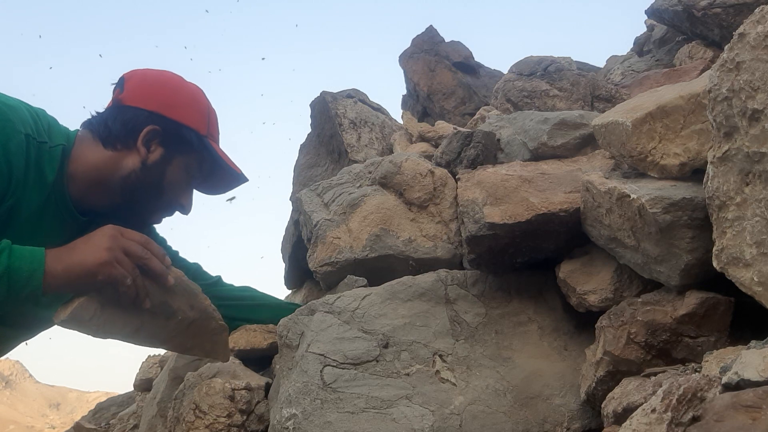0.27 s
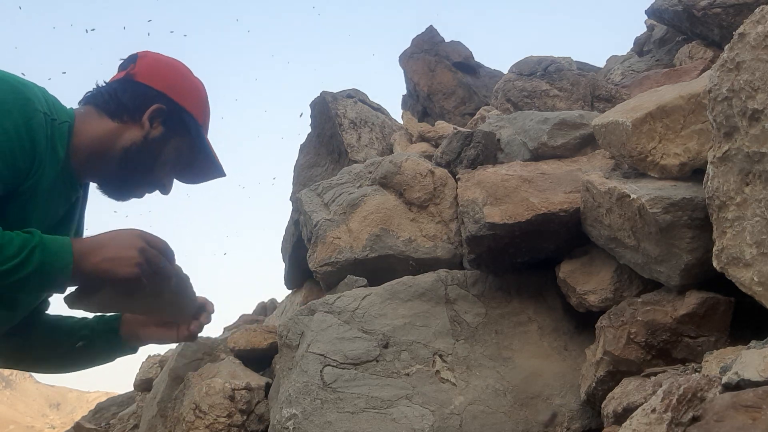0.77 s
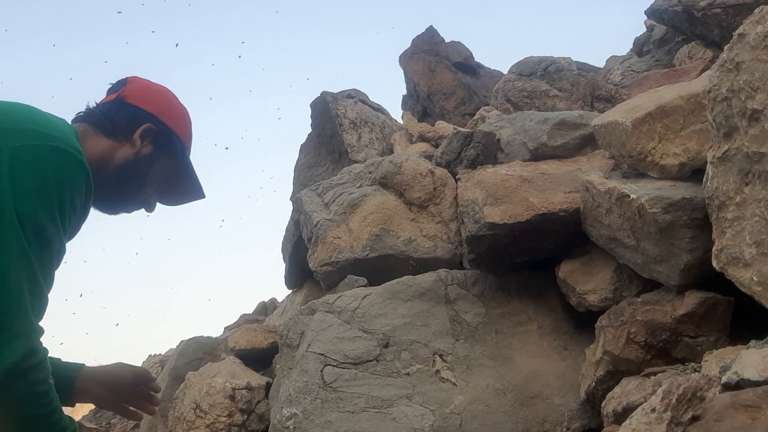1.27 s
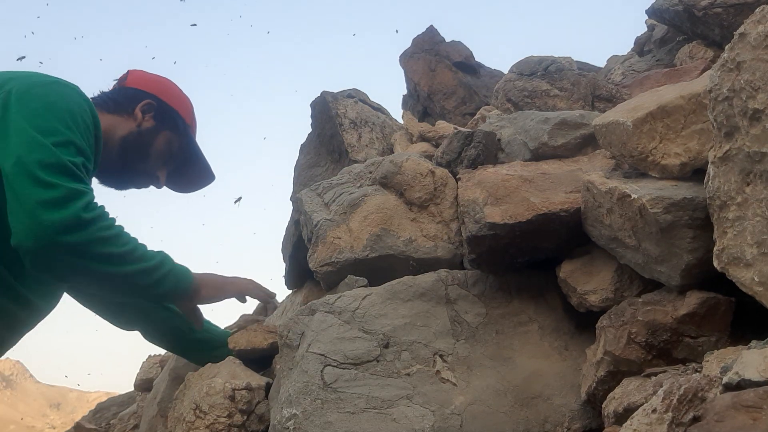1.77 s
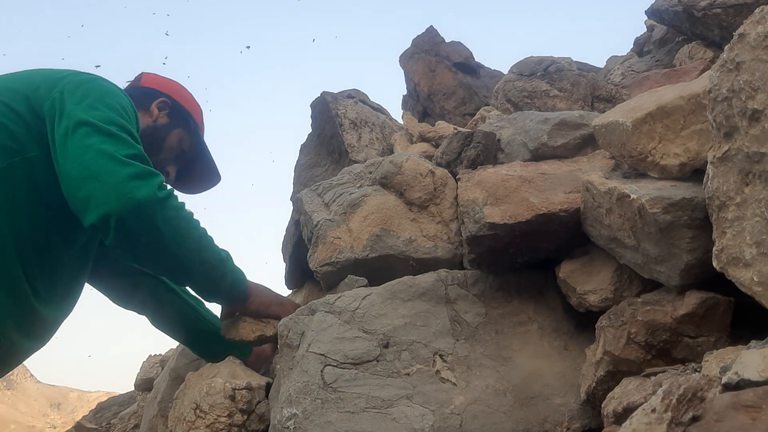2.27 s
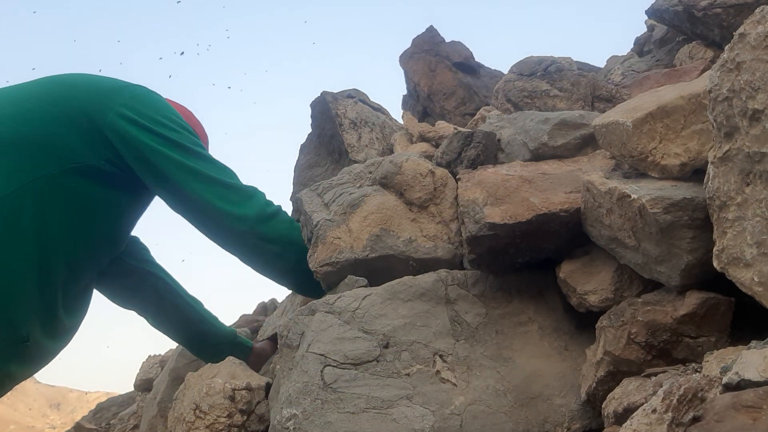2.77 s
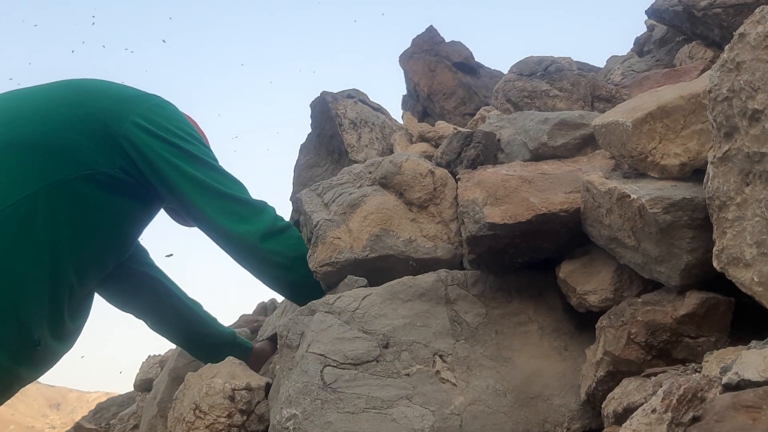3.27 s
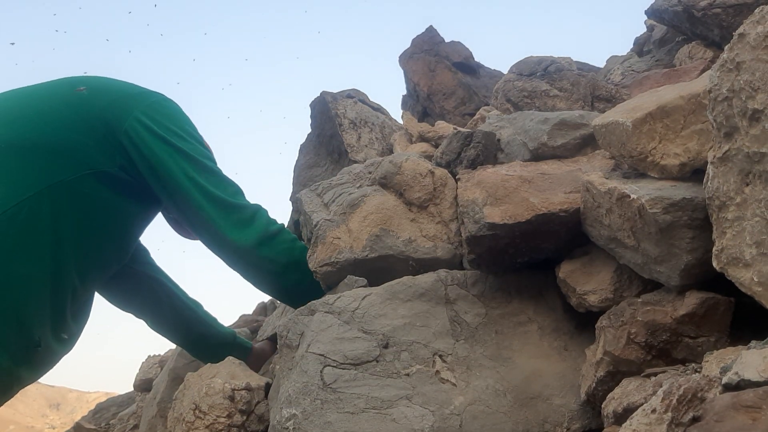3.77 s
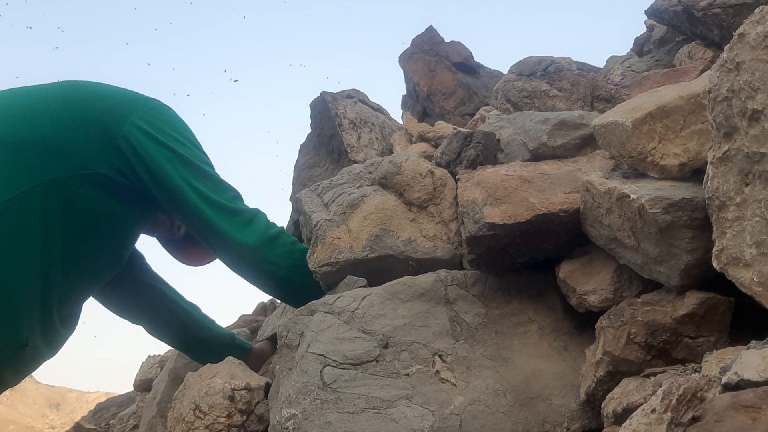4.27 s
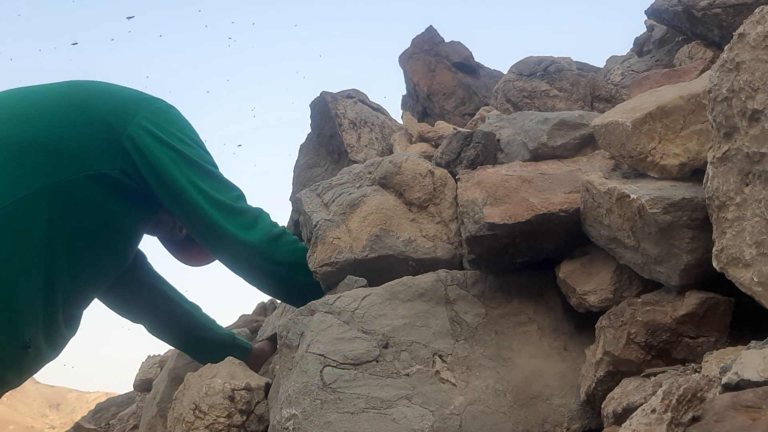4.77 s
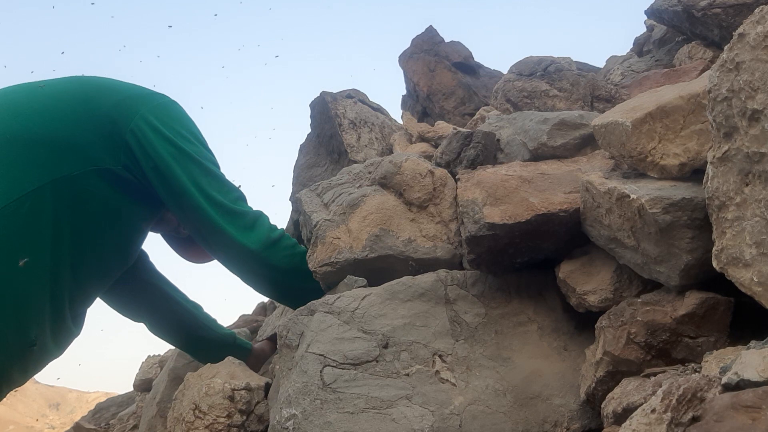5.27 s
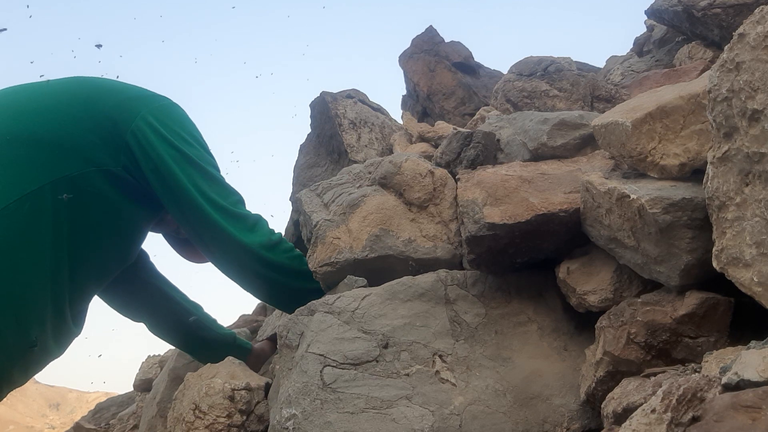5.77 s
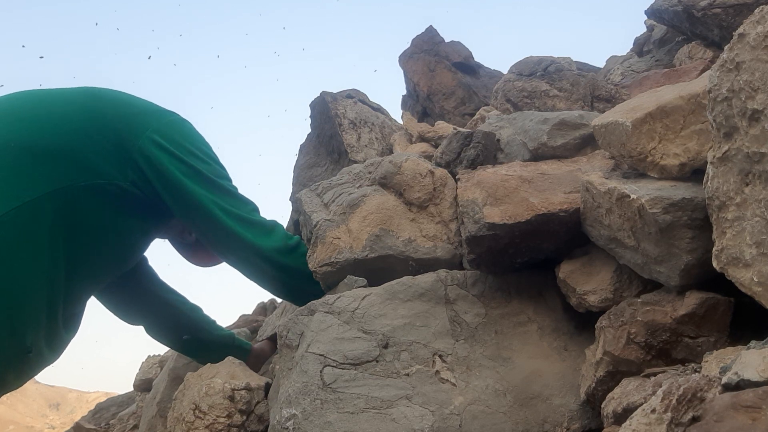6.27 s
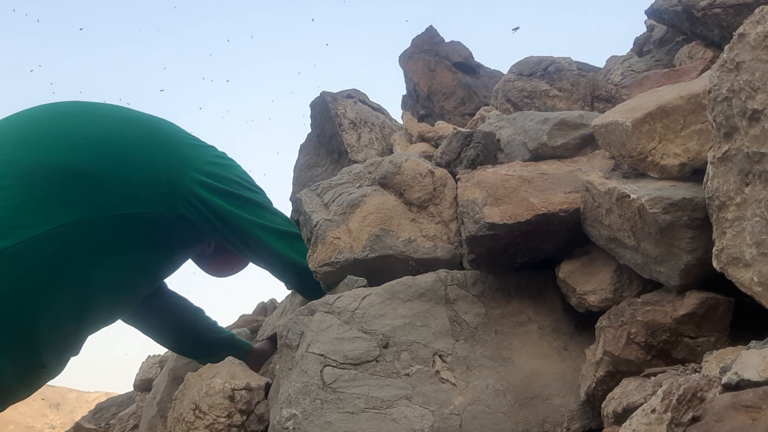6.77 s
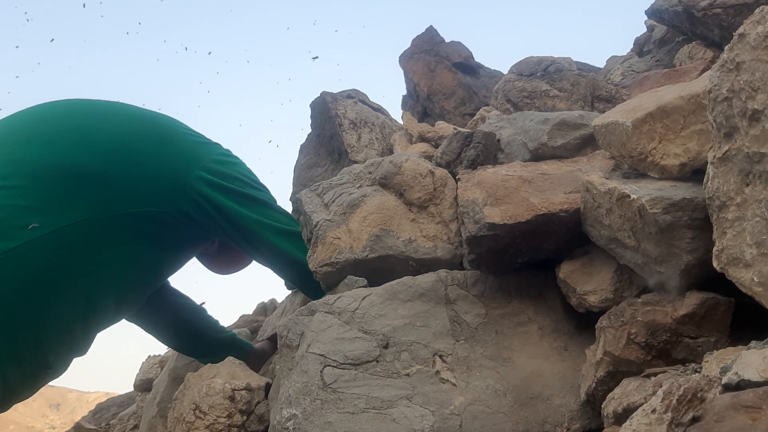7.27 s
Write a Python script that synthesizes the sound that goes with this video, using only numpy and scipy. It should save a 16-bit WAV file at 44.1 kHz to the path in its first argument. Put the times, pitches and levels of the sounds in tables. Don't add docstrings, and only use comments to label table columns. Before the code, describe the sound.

On a stony slope, bees drone softly over air hiss. A dropped metal bar clanks twice in quick succession, sharp and bright with a rocky thud, its ring fading in under a second. Afterwards dull stone knocks, small chip clicks and gritty scrapes come in uneven clusters, mostly nearer the left, while wind flutters low against the microphone, stronger on the right. The end is sparser.

```python
import sys
import numpy as np
from scipy import signal
from scipy.fft import rfft, irfft
from scipy.io import wavfile

SR = 44100
rng = np.random.default_rng(int(sys.argv[2]) if len(sys.argv) > 2 else 0)


def attenuation_scalar(level_db):
    decades = np.asarray(level_db, float) / 20
    return 10 ** decades


def bounce(signal):
    frames = np.transpose(np.atleast_2d(signal))
    limited = np.clip(frames, -1, 1)
    pcm = np.round(limited * 32767).astype(np.int16)
    wavfile.write(sys.argv[1], SR, pcm)


N = 332073
T = np.arange(N) / SR
LEFT_LAG_SAMPLES = -8

# f/Hz, density/dB per Hz
AIR_SPECTRUM = [(18, -44), (32, -14.5), (75, -6), (124, -17), (173, -2.5), (262, -18), (373, -2),
                (730, -16), (960, -11), (1300, -18), (1550, -15.5), (1780, -26.5), (2070, -20.5),
                (2400, -28),
                (2800, -29.5), (3500, -30.5), (4500, -29), (4900, -25), (6500, -22.5), (7700, -23.5),
                     (8100, -43), (9000, -41.5), (9900, -37), (10300, -28), (12000, -22), (15700, -19)]
# f/Hz, likeness/1
PORT_LIKENESS = [(60, 0.72), (180, 0.72), (550, 0.083), (1650, 0.018), (4970, 0.12), (15000, 0.081)]
# f/Hz, L-R/dB
PORT_LEAN = [(60, 4.5), (180, 8), (550, 9.5), (1650, 6.5), (4970, 12.5), (15000, 7)]
# t/s, level/dB
SWARM_LEVEL = [(0.0, -74.5), (0.57, -81.5), (0.8, -84), (1.05, -70.5), (1.4, -73), (1.6, -62),
               (2.33, -83.5), (2.95, -67.5), (3.67, -66.5), (3.86, -63), (4.03, -71.5), (4.53, -67.5),
               (4.72, -75), (6.46, -71), (7.13, -68), (7.53, -67)]
# multiple/1, level/dB
WING_HARMONICS = [(1, -10), (2, -1.5), (3, -13.5), (4, -10), (5, -10.5), (6, -13.5), (7, -22.5), (8, -24)]
# t/s, length/s, start f/Hz, end f/Hz, level/dB
BIRD_NOTES = [(1.385, 0.058, 4100, 3790, -78), (3.01, 0.058, 4080, 3790, -83),
              (4.71, 0.082, 4080, 3700, -83.5), (5.295, .045, 4400, 4100, -80.5),
              (5.34, 0.15, 4840, 4450, -76.5), (5.47, .08, 2870, 2800, -86), (5.69, 0.052, 5440, 5000, -82),
              (5.98, .05, 5620, 5200, -78.5)]
# t/s, peak/dB, rise/s, fall/s (20 dB each), L-R/dB
WIND_GUSTS = [(1.56, -53, .1, 0.19, 3.5), (2.01, -75, .27, .15, -19), (2.39, -59, 0.11, 0.13, -22),
              (2.56, -62.5, 0.28, 0.42, -11), (2.92, -46.5, 0.23, 0.48, -13),
              (3.30, -45.5, 0.12, 0.24, -16.5), (3.44, -46, .2, 0.044, -9.5), (3.6, -52, .09, 0.56, -5.5),
              (3.89, -53, .15, .11, -8), (4.05, -59, .3, 0.047, 12.5), (4.16, -58, 0.035, 0.46, -16.5),
              (4.28, -50, 0.14, 0.16, -10), (4.36, -60, .1, 0.046, -16), (4.46, -67, .2, 0.57, 4),
              (4.85, -61.5, 0.28, 0.24, -9), (4.97, -56.5, 0.22, 0.4, -1), (5.09, -48.5, 0.19, 0.12, -12),
              (5.31, -48.5, 0.08, 0.17, 20.5), (5.41, -53, 0.16, 0.039, 16), (5.87, -61, .1, 0.34, -0.5),
              (6.13, -64, 0.37, 0.031, -19.5), (6.53, -65.5, 0.064, .08, -17), (7.4, -68, 0.31, 0.2, -15)]
# t/s, peak/dB
RIGHT_PUFFS = [(4.149, -37.5), (4.189, -34), (4.329, -43), (5.066, -38.5)]
# t/s, peak/dB, rise/s, fall/s (20 dB each)
GRIT_STROKES = [(2.396, -82, 0.058, 0.046), (4.956, -57.5, 0.0099, 0.042), (5.035, -63, 0.036, 0.028),
                (5.062, -58, 0.015, 0.017), (5.09, -75, .03, 0.13), (5.81, -71, 0.025, .04)]
# f/Hz, density/dB per Hz
GRIT_SPECTRUM = [(590, -45), (1000, -9), (1150, -16), (2010, -9), (3330, -21), (4920, -17.5), (5650, -20.5),
                 (7700, -23), (8440, -56), (11600, -33), (15500, -31)]
# t/s, peak/dB, pitch f/Hz, bright part/dB, its tilt/dB per octave
STONE_KNOCKS = [(2.032, -61, 413, -1.5, 0), (2.283, -65.5, 357, 0, -0.5), (2.366, -58, 341, -3.5, -1.5),
                (2.578, -62.5, 354, -7, 3), (2.648, -58, 285, -12.5, 0), (2.8109, -36, 304, 2.5, 0.5),
                (2.863, -48.5, 399, 1, 3), (3.052, -36.5, 416, -6, -2), (3.299, -51, 327.5, -6.5, 1),
                (3.429, -51, 232, -9.5, 2.5), (3.761, -41, 392, -8.5, -5.5), (3.797, -48, 218, -25, 0),
                (3.862, -37, 384, -19, -8), (3.954, -53, 263, -16.5, 2), (4.237, -50, 355, -3.5, 6),
                (4.269, -42.5, 300, -8, 5.5), (4.304, -44.5, 269, -19, 2), (4.469, -46, 226, -1, -8),
                (4.714, -59.5, 236, -13, 0.5), (4.927, -50, 402, -20, 3), (4.9525, -32, 360, -6, -0.5),
                (5.02, -42.5, 261, -15.5, 0.5), (5.059, -54.5, 280, -0.5, 5), (5.234, -48, 253, -19, -3),
                (5.782, -38, 270, -22.5, 0), (5.81, -46.5, 239, -14, 0), (6.691, -44.5, 260, -6.5, -5.5),
                (6.921, -39, 284, -2.5, -11), (6.931, -43, 267, -3, -8), (6.942, -46, 238, -20.5, -4.5),
                (7.17, -52, 292, -19.5, 0)]
# f/Hz, level/dB, t60/s
STONE_MODES = [(518, 4.5, 0.06), (700, -0.5, 0.048), (852, 6.5, 0.037), (956.7, 1.5, 0.059),
               (1150, -10.5, 0.025), (1560, -9, 0.06), (2050, -19, 0.035)]
# t/s, peak/dB, f/Hz, t60/s
SHORT_PINGS = [(1.653, -46.5, 6360, 0.07), (1.654, -60, 7130, 0.2), (1.654, -61, 12530, 0.13),
               (1.66, -66, 11900, 0.14), (2.819, -63.5, 6630, 0.082), (2.87, -73.5, 6700, 0.15),
               (1.695, -61, 3584, 0.26), (2.36, -69.5, 2270, 0.13), (2.645, -69.5, 2290, 0.18),
               (2.811, -60.5, 2050, 0.11), (2.82, -80, 8180, 0.13), (2.82, -74, 10410, 0.23),
               (2.838, -68, 2280, 0.051), (2.888, -64, 2284, 0.11), (3.10, -65, 2335, 0.17),
               (3.31, -69.5, 6650, 0.09), (3.60, -73, 6460, 0.064), (4.243, -63.5, 6650, 0.24),
               (4.72, -74.5, 6700, 0.044), (5.057, -48.5, 5550, 0.024), (5.058, -58.5, 4400, .025),
               (5.06, -63, 7000, 0.037), (5.07, -65, 2450, 0.064), (4.927, -66, 1550, .05),
               (2.865, -66, 2040, 0.1), (5.785, -75, 6600, .06)]
# t/s, peak/dB, rise/s, fall/s (20 dB each)
STONE_HEAVES = [(1.48, -33, 0.0084, 0.19), (1.59, -25, 0.045, 0.011), (1.67, -35, 0.084, 0.064),
                (1.96, -55.5, 0.29, 0.089), (2.05, -56, 0.082, 0.083), (2.37, -50.5, 0.089, 0.068),
                (2.62, -59, 0.15, 0.52), (2.85, -48, 0.057, 0.21), (3.065, -45, 0.036, 0.12),
                (3.43, -50.5, 0.66, .12), (3.62, -56, 0.45, .5), (3.775, -45, .015, 0.078),
                (3.875, -39.5, 0.014, 0.12), (3.96, -47.5, 0.11, 0.082), (4.2, -52.5, 0.024, .05),
                (4.28, -43.5, 0.11, 0.11), (4.49, -47, 0.049, 0.12), (4.73, -55, 0.041, 0.06),
                (4.962, -38.5, 0.01, 0.16), (5.24, -57, 0.21, 0.046), (5.31, -50, 0.047, 0.18),
                (5.79, -43, 0.022, 0.16), (6.71, -45, 0.028, 0.097), (6.95, -47, 0.045, 0.079),
                (7.2, -48.5, 0.17, 0.13)]
# f/Hz, level on one face/dB, level on other face/dB, t60/s, L-R/dB
BAR_MODES = [(2215, 0, 0, .35, 8.5), (3596, -16, -40, .13, 13), (3582, -58, -28, .2, -14),
             (4433, -47, -43, .06, 6), (5570, -47, -34, .15, 14), (6347, -61, -40, .08, 19),
             (7182, -52, -54, .1, 19), (10030, -75, -56, .05, 8), (10780, -56, -51, .07, 7),
             (12100, -62, -52, .09, 3), (12460, -64, -54, .1, 5), (2056, -18, -20, .03, 8),
             (2290, -18, -19, .03, 8), (15500, -52, -80, .05, 6)]
# t/s, blow/dB, ring kept/0-1, overtones/dB, thud/dB
BAR_BOUNCES = [(1.468, -43, 0.8, 7, -52.5), (1.4721, -7.5, .9, 5, -19.5), (1.4885, -29, 0.9, -7, -20.5),
               (1.520, -36, 0.91, 10, -30.5), (1.5635, -42.5, 0.06, 20, -26),
               (1.5795, -8.5, 0.13, 7, -16.5), (1.63, -49, 0.57, 16, -31.5), (1.654, -59, 0.78, 34.5, -27),
               (1.670, -54, 0.86, 14.5, -51.5), (1.684, -61.5, 0.32, -2, -40.5), (1.694, -69, 0, -6, -49),
               (1.708, -75, 0, 5, -49)]
# f/Hz, level/dB, t60/s
GROUND_MODES = [(750, -2, 0.029), (786, -4.5, 0.036), (938, -7.5, .04), (1126.6, -10, .03),
                (1594, -3.5, .025), (2870, -10.5, .025), (4632, -30.5, .01), (1556, -5, .045),
                (3300, -9, .03)]
# t/s, level/dB
BAR_ROCKING = [
    (1.708, -52.5),
    (1.829, -61),
    (1.899, -55.5),
    (1.95, -60),
    (2.022, -60.5),
    (2.1, -68),
    (2.2, -70.5),
]


def rms_one(x):
    return x / np.sqrt(np.mean(x ** 2) + 1e-20)


def at_hz(points, hz):
    table_hz, value = np.transpose(points)
    return np.interp(np.log(hz + 1), np.log(table_hz), value)


def drift(rate_hz):
    r = np.exp(-80 * np.pi * rate_hz / SR)
    slow = signal.lfilter([1], [1, -2 * r, r * r], rng.standard_normal(N // 40 + 2002))[2000:]
    return np.interp(np.arange(N) / 40, np.arange(len(slow)), rms_one(slow - slow.mean()))


def ring(clicks, hz, t60_s):
    r = attenuation_scalar(-60 / (t60_s * SR))
    w = 2 * np.pi * hz / SR
    return signal.lfilter([0, np.sin(w)], [1, -2 * r * np.cos(w), r * r], clicks + 1e-18)


def band(x, low_hz, high_hz):
    return signal.sosfilt(signal.butter(2, [low_hz, high_hz], "band", fs=SR, output="sos"), x)


def place(x, pan_db, lag_samples):
    left = np.roll(x, max(round(lag_samples), 0)) * attenuation_scalar(pan_db / 2)
    right = np.roll(x, max(-round(lag_samples), 0)) * attenuation_scalar(-pan_db / 2)
    return np.array([left, right])


def add(out, s, sound):
    i = round(s * SR)
    out[..., i:i + sound.shape[-1]] += sound[..., :N - i]


def swells(rows):
    s, peak_db, rise_s, fall_s = np.transpose(rows)[:4, :, None]
    t = T[::40]
    return attenuation_scalar(peak_db - 20 * np.maximum((s - t) / rise_s, (t - s) / fall_s))


def joined(gains):
    return np.interp(T, T[::40], np.sqrt(np.sum(gains ** 2, axis=0)))


def air():
    floor_db, duck_db = -77.5, 5.5
    sink_s, hold_s, recover_s = .3, .85, .3
    hz = np.arange(N // 2 + 1) * SR / N
    mid, side = rfft(rng.standard_normal((2, N))) * attenuation_scalar(at_hz(AIR_SPECTRUM, hz))
    alike = at_hz(PORT_LIKENESS, hz)
    lean = attenuation_scalar(at_hz(PORT_LEAN, hz) / 2)
    left = (np.sqrt(1 + alike) * mid + np.sqrt(1 - alike) * side) * lean
    right = (np.sqrt(1 + alike) * mid - np.sqrt(1 - alike) * side) / lean
    duck = np.interp(T - BAR_BOUNCES[5][0], np.cumsum([0, sink_s, hold_s, recover_s]), [0, 1, 1, 0])
    level_db = floor_db - duck_db * duck + 13.5 + 1.0 * drift(12.0)
    return rms_one(irfft(np.array([left, right]), N)) * attenuation_scalar(level_db)


def bees(count=9):
    out = 0
    for hz in np.linspace(167, 194, count):
        wing_hz = hz * (1 + .022 * drift(1.5) + .012 * drift(25))
        phase = 2 * np.pi * np.cumsum(wing_hz) / SR
        buzz = sum(attenuation_scalar(level_db) * np.sin(k * phase) for k, level_db in WING_HARMONICS)
        lag_samples = LEFT_LAG_SAMPLES + 6 * rng.standard_normal()
        out = out + place(buzz * attenuation_scalar(4.5 * drift(7.5)), 7.0, lag_samples)
    s, swarm_db = np.transpose(SWARM_LEVEL)
    return rms_one(out) * attenuation_scalar(np.interp(T, s, swarm_db) + 1.5)


def birds():
    out = np.zeros(N)
    for s, length_s, from_hz, to_hz, level_db in BIRD_NOTES:
        n = round(length_s * SR)
        phase = 2 * np.pi * np.cumsum(np.linspace(from_hz, to_hz, n)) / SR
        add(out, s, attenuation_scalar(level_db) * np.hanning(n) ** .5 * np.sin(phase))
    return place(out * attenuation_scalar(4.2 * drift(109.2) - 2.5), 14.0, LEFT_LAG_SAMPLES)


def buffeting():
    calm_db, shed_hz = -85.5, 26
    t = np.arange(SR // 16) / SR
    puff_hz = 45 + 100 * np.exp(-t / .014)
    puff = np.sin(2 * np.pi * np.cumsum(puff_hz) / SR) * t * np.exp(-t / .0075)
    puff = band(puff / puff.max(), 30, 300)
    shed = np.array([np.cumsum(shed_hz * attenuation_scalar(4 * drift(8))) / SR for port in range(2)])
    clicks = np.diff(np.floor(shed), prepend=0) * attenuation_scalar(3 * rng.standard_normal((2, N)))
    clicks = clicks * rng.choice([-1, 1], (2, N))
    lean = attenuation_scalar(np.array(WIND_GUSTS)[:, 4:] * [.5, -.5])
    lean = lean / np.sqrt(np.mean(lean ** 2, axis=1, keepdims=True))
    gusts = np.array([joined(swells(WIND_GUSTS) * port[:, None]) for port in lean.T])
    gusts = gusts + attenuation_scalar(calm_db) * (T > BAR_BOUNCES[0][0])
    eddies = rms_one(band(signal.fftconvolve(clicks, puff[None], axes=1)[:, :N], 22, 105))
    swings = rms_one(band(band(rng.standard_normal((2, N)), 28.34, 82), 25, 74.8))
    out = (eddies + 0.98 * swings) * attenuation_scalar(-5.0) * gusts
    for s, peak_db in RIGHT_PUFFS:
        add(out, s, attenuation_scalar(peak_db) * puff * attenuation_scalar([[-14], [0]]))
    return out


def grit():
    grains = rng.standard_normal(N) * attenuation_scalar(1.6 * np.minimum(rng.exponential(1, N), 5))
    colour = attenuation_scalar(at_hz(GRIT_SPECTRUM, np.arange(N // 2 + 1) * SR / N))
    grains = rms_one(irfft(rfft(grains) * colour, N))
    return place(grains * joined(swells(GRIT_STROKES)) * attenuation_scalar(2.5), 9.0, LEFT_LAG_SAMPLES)


def knock(hz, bright_db, t60_s, modes, top_hz, chance, crush, spread_db):
    t = np.arange(len(chance)) / SR
    touch = np.convolve(t == 0, np.hanning(18))[:len(t)] / 8
    touch = touch + .05 * chance * attenuation_scalar(-60 * t / (1.5 * t60_s))
    low = ring(touch, hz, 0.85 * t60_s)
    low = low + 0.52 * ring(touch, 0.63 * hz, t60_s)
    low = low - 0.6 * ring(touch, 1.463 * hz, .5 * t60_s)
    high = 0
    for (mode_hz, db, mode_t60_s), z in zip(modes, chance):
        high = high + attenuation_scalar(db + spread_db * z) * ring(touch, mode_hz * (1 + 0.02009 * z), 0.58 * mode_t60_s)
    crunch = crush * signal.lfilter([.09], [1, -1.4, .49], chance) * attenuation_scalar(-60 * t / 0.055)
    low = band(low + .4 * crunch, 110, 1500)
    bottom_hz = .75 * modes[0][0]
    high = band(band(high + crunch, bottom_hz, top_hz), bottom_hz, 1.3 * top_hz)
    return low / np.abs(low).max() + attenuation_scalar(bright_db) * high / np.abs(high).max()


def stone_knocks():
    out = np.zeros((2, N))
    for s, peak_db, hz, bright_db, tilt_db in STONE_KNOCKS:
        t60_s = np.clip(18 / hz, .02, .25)
        pan_db = 7.5 + 0.45 * (-44 - peak_db)
        modes = [(f, db + tilt_db * np.log2(f / STONE_MODES[2][0]), mode_t60_s)
                 for f, db, mode_t60_s in STONE_MODES]
        chance = rng.standard_normal(SR // 4)
        one = knock(hz, bright_db, t60_s, modes, 1700, chance, crush=.8, spread_db=-1.5)
        add(out, s, place(attenuation_scalar(peak_db) * one, pan_db, LEFT_LAG_SAMPLES / 2))
    return out


def short_pings():
    out = np.zeros((2, N))
    for s, peak_db, hz, t60_s in SHORT_PINGS:
        rattle = rng.standard_normal(SR // 4) * attenuation_scalar(-60 * T[:SR // 4] / t60_s)
        ping = ring(band(rattle, 0.8 * hz, 1.1 * hz), hz, .42 * t60_s)
        add(out, s, place(attenuation_scalar(peak_db) * ping / np.abs(ping).max(), 12, LEFT_LAG_SAMPLES))
    return out


def grinding():
    still_db, slips_per_s = -82, 350
    size = attenuation_scalar(3 * np.minimum(rng.exponential(1, N), 4))
    slips = (rng.random(N) < slips_per_s / SR) * size * rng.choice([-1, 1], N)
    dealt = rng.integers(0, 10, N)
    body = 0
    for k, hz in enumerate(np.geomspace(135, 520, 10)):
        body = body + ring(slips * (dealt == k), hz, 3.6 / hz) * (hz / 200) ** -.3
    level = joined(swells(STONE_HEAVES)) + attenuation_scalar(still_db) * (T > STONE_HEAVES[0][0])
    return place(level * attenuation_scalar(-8.5) * rms_one(band(body, 120, 700)), 4.5, LEFT_LAG_SAMPLES / 2)


def bar_ring():
    first_face, roll_s = .12, 0.11
    out = np.zeros((2, N))
    start = round(BAR_BOUNCES[0][0] * SR)
    t = T[start:start + SR // 2]
    for k, (hz, one_db, other_db, t60_s, pan_db) in enumerate(BAR_MODES):
        height, left, last_s = np.zeros(len(t)), 0, 0
        for s, blow_db, kept, overtones_db, _ in BAR_BOUNCES:
            face = np.clip(first_face + (s - t[0]) / roll_s, 0, 1)
            left = left * attenuation_scalar(-60 * (s - last_s) / t60_s)
            left = left * kept ** np.sqrt(hz / BAR_MODES[0][0])
            left = left + attenuation_scalar(blow_db + one_db + face * (other_db - one_db) + (k > 0) * overtones_db)
            height = np.where(t >= s, left * attenuation_scalar(-60 * np.maximum(t - s, 0) / t60_s), height)
            last_s = s
        height = signal.lfilter([.04], [1, -.96], height)
        add(out, t[0], place(height * np.sin(2 * np.pi * hz * t), pan_db, LEFT_LAG_SAMPLES))
    return out


def bar_thuds():
    crack_db, crack_t60_s, crack_hz = -24.5, .025, 2600
    out = np.zeros((2, N))
    for s, *_, thud_db in BAR_BOUNCES:
        chance = rng.standard_normal(SR // 4)
        crack = band(band(chance[::-1], crack_hz, 6500), crack_hz, 6500)
        crack = crack * attenuation_scalar(crack_db + 12.5 - 60 * T[:SR // 4] / crack_t60_s)
        thud = knock(329, 12.6, 0.035, GROUND_MODES, 3600, chance, crush=.6, spread_db=-0.1)
        add(out, s, place(attenuation_scalar(thud_db - 10.0) * (thud + crack), 7.1, LEFT_LAG_SAMPLES))
    return out


def bar_rocking():
    rise_s, fall_s = 0.029, 0.058
    rows = [(s, db, rise_s, fall_s) for s, db in BAR_ROCKING]
    rows.append((BAR_ROCKING[0][0], -62.5, rise_s, 0.54))
    sings = joined(swells(rows)) * (T > BAR_BOUNCES[-2][0])
    tone = np.sin(2 * np.pi * BAR_MODES[0][0] * T) + .06 * np.sin(2 * np.pi * BAR_MODES[1][0] * T)
    return place(sings * attenuation_scalar(3 + 2.5 * drift(40)) * tone, 8.0, LEFT_LAG_SAMPLES)


def scene():
    background = air() + bees() + birds() + buffeting()
    slope = grit() + stone_knocks() + short_pings() + grinding()
    return background + slope + bar_ring() + bar_thuds() + bar_rocking()


def low_pass(x):
    return signal.sosfilt(signal.butter(12, 16950, fs=SR, output="sos"), x)


def record(dry):
    keep = np.arange(N // 2 + 1) * SR / N < 15770
    mix = irfft(rfft(np.clip(dry, -1, 1)) * keep, N)
    return low_pass(mix)


dry = scene()
out = record(dry)
bounce(out)
```